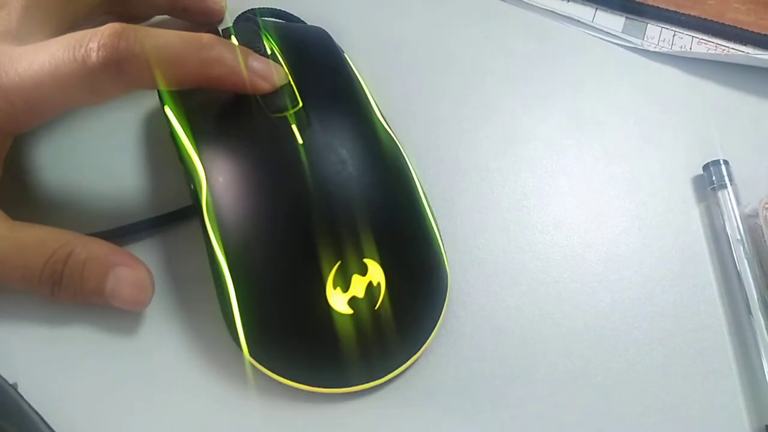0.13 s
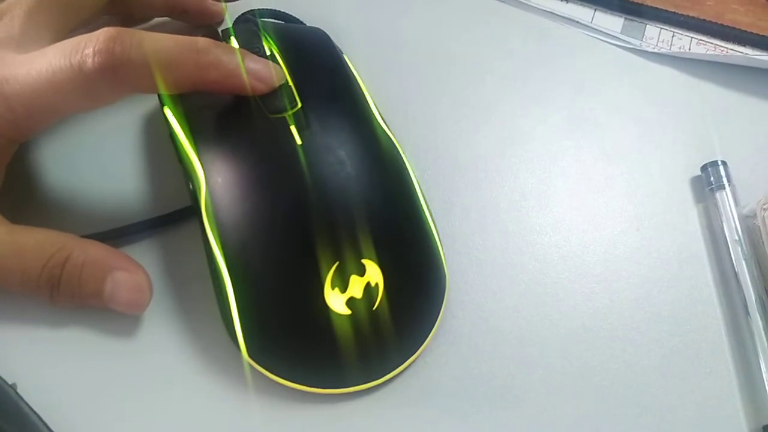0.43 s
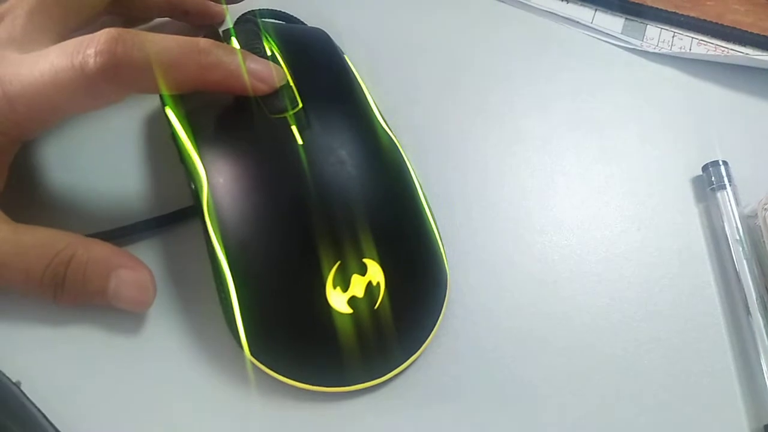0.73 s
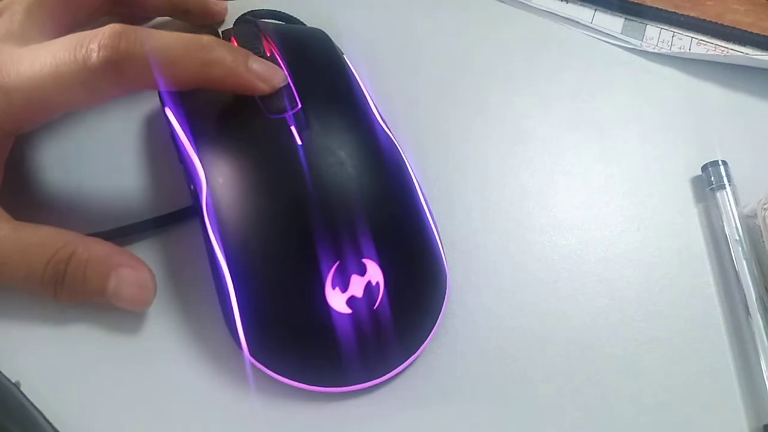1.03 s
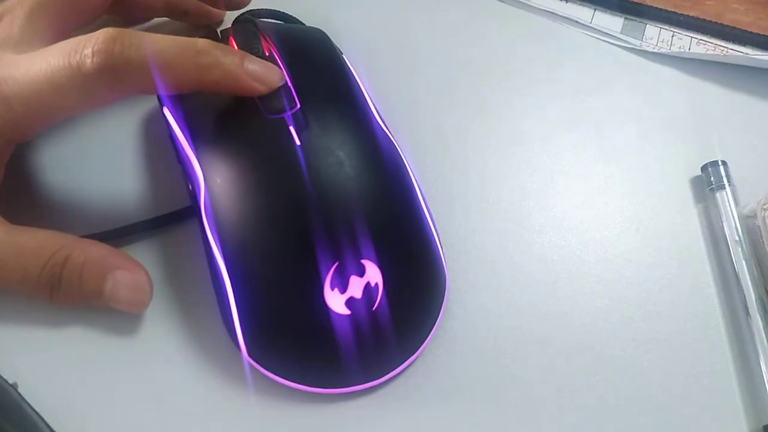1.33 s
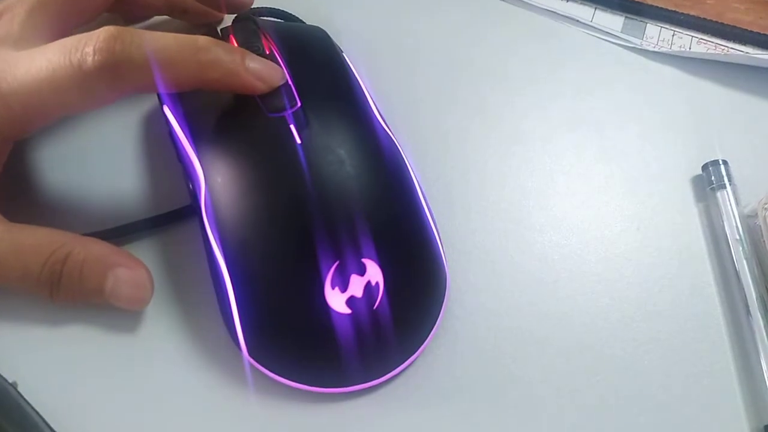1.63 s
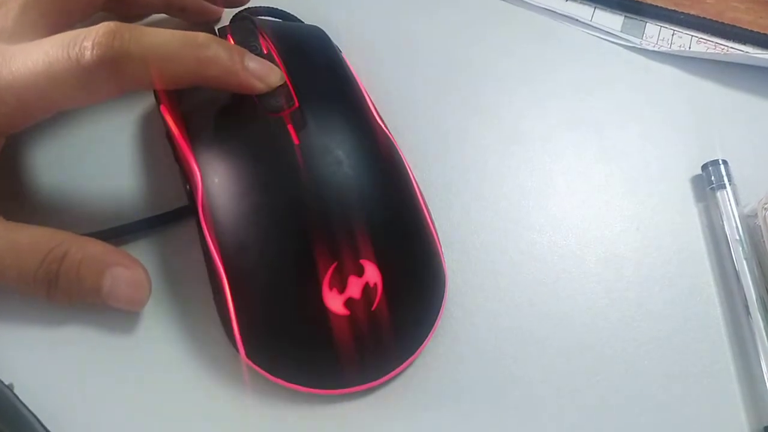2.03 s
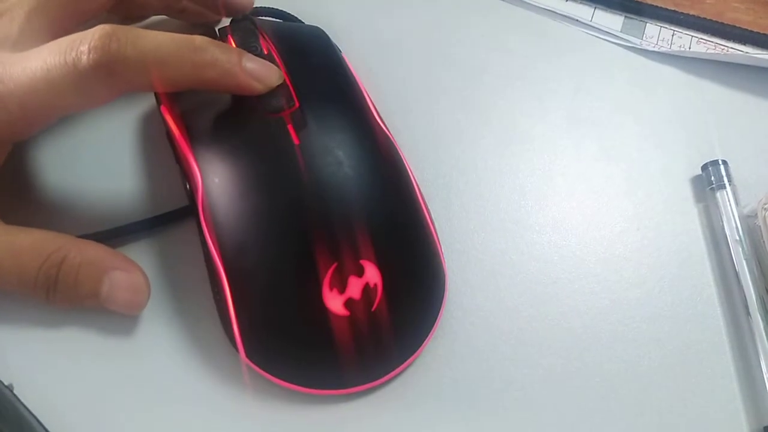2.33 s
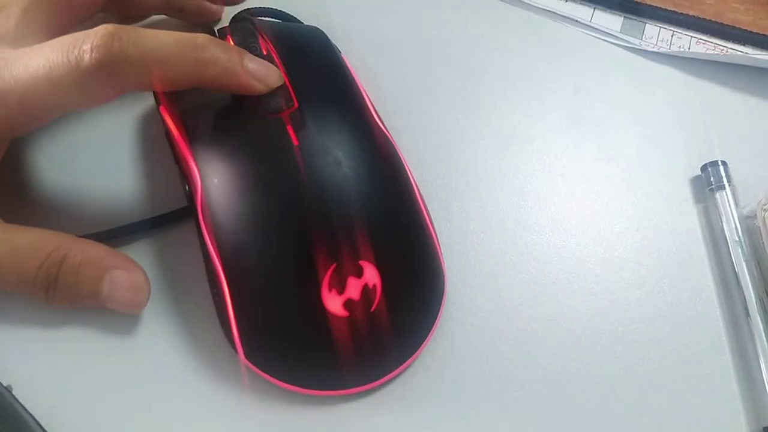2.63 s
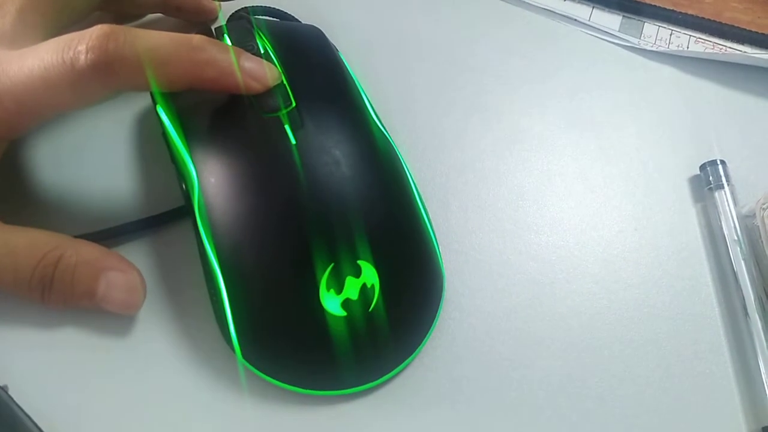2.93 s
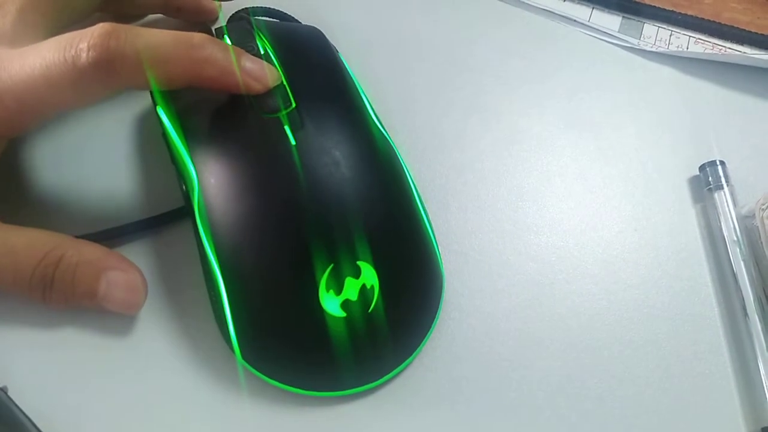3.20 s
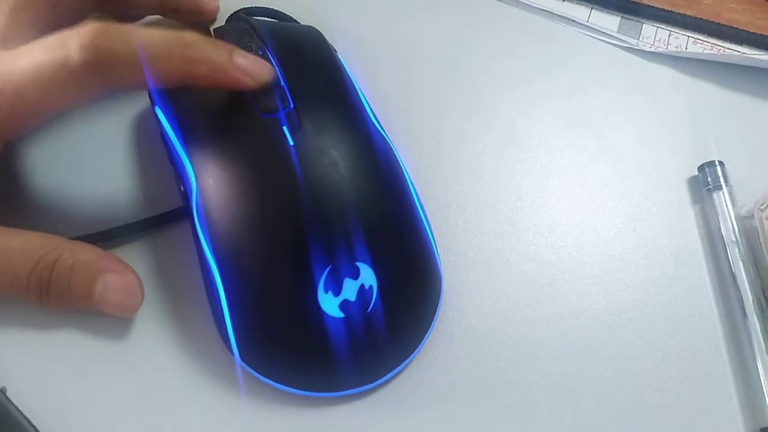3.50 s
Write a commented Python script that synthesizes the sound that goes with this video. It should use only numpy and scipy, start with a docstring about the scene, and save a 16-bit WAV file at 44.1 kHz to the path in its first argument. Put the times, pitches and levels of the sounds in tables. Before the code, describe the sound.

A computer mouse button clicks sharply down and up several times, with a faint fan drone behind.

```python
"""Mouse clicks on a desk

A finger presses and releases a computer mouse button close to the right microphone. Each snap of the
switch rings the plastic shell for a few milliseconds, and the small room answers. A computer fan and
mains hum drone behind, with a faint uneven hiss and, in the first second, a thin whistle."""
import sys
import numpy as np
from scipy import signal
from scipy.fft import rfft, irfft
from scipy.io import wavfile
from scipy.ndimage import uniform_filter1d

SR = 44100
rng = np.random.default_rng(int(sys.argv[2]) if len(sys.argv) > 2 else 0)


def persist_wave(psi):
    """Save psi, clipped to +-1, as 16-bit WAV."""
    counts = np.round(np.clip(psi, -1, 1) * 32767).astype(np.int16)
    wavfile.write(sys.argv[1], SR, np.atleast_2d(counts).T)


N = 161406
T = np.arange(N) / SR

# tone of the fan and room air (frequency [Hz], left density [dB], right density [dB])
AIR_SPECTRUM = [(20, -83, -94), (37.3, -93, -106), (45.8, -75, -86), (55.3, -59.5, -63.5),
                (78, -66.5, -70.5), (119, -61, -64), (183, -68.5, -73), (272, -66, -70.5),
                (351, -80.5, -73), (430, -68.5, -73), (532, -77.5, -77), (700, -75, -76.5),
                (855, -81.5, -71.5), (1190, -77, -82), (1448, -84, -81), (1936, -91.5, -88),
                (2090, -79, -88), (2256, -100, -102), (2930, -104.6, -95), (3420, -116, -109),
                (4430, -112.4, -102), (5000, -119.3, -101), (6280, -125, -100), (6580, -125, -112),
                (7700, -128.6, -110), (9000, -129, -119), (11300, -128, -122), (14100, -132, -131),
                (15500, -140, -140)]
# how alike the air is on both sides (frequency [Hz], correlation [-1..1])
AIR_CORRELATION = [(40, 1), (125, 1), (260, 0.86), (450, 0.55), (750, -0.49), (1300, 0.099), (2100, -0.057),
                   (5000, 0)]
# level rides on four bands of the air, low to high (time [s], level [dB])
SUB_RIDE = [(0, -2), (1.0, 2), (1.6, -2.5), (2.0, -2), (2.5, 3), (2.8, 4), (3.2, -0.5), (3.65, 3.5)]
RUMBLE_RIDE = [(0, -.5), (1.0, 1), (1.6, 0), (2.0, 0.5), (2.4, 2.5), (2.8, 0.5), (3.2, 0), (3.65, 1.5)]
LOW_HISS_RIDE = [(0, -0.5), (.45, -4), (.85, 2.5), (1.4, -8), (1.65, -0.5), (1.9, -3.5), (2.4, 2.5),
                 (2.62, 2.5), (3.15, -3), (3.65, -2.5)]
HIGH_HISS_RIDE = [(0, 6.5), (.38, -1), (.45, 8), (.62, 1), (.85, -4.5), (1.0, -3), (1.45, -11),
                  (1.56, -2.5), (1.75, -4.5), (1.9, -5), (2.4, -2), (2.62, -2.5), (3.15, 1), (3.65, -7.5)]
# level rides on two narrow bands of treble noise (time [s], level [dB])
SIZZLE_RIDE = [(0, -46), (.1, -59.5), (.24, -62), (.45, -80), (.7, -69), (.85, -76), (.98, -78),
               (1.35, -74), (1.5, -73), (1.75, -73.5), (1.9, -79), (2.45, -80), (2.85, -74), (3.2, -72),
               (3.65, -83)]
SHEEN_RIDE = [(0, -75), (.2, -73), (.38, -73), (.48, -94), (.7, -110)]
# path of the thin whistle (time [s], pitch [Hz], level [dB])
WHISTLE_PATH = [(.04, 12900, -84), (.2, 11800, -79), (.3, 13200, -88), (.4, 13050, -79), (.49, 13400, -70),
                (.55, 13100, -69), (.62, 12400, -88), (.72, 13150, -76), (.8, 12650, -82),
                (.85, 12100, -79), (.9, 11300, -84)]
# hum tones (multiple of the mains or shaft rate, left [dB], right [dB], left phase lead [rad])
MAINS_TONES = [(2, -46, -51, .2), (6, -56, -60, .3), (8, -64, -68, 0)]
FAN_TONES = [(5, -53.5, -57.5, 0), (10, -53.5, -58, .1), (20, -64, -60, -.2), (33, -64, -81, -.9),
             (37, -67, -71, 1.1), (39, -61, -74, -.1), (41, -57.5, -69, -1.3), (49, -54, -53.5, -2.4),
             (50, -54.7, -56, -.6), (52, -72, -60, -1.3), (53, -66, -74, -1.2), (54, -67, -61, .1),
             (55, -69, -58, -2.1), (56, -72, -63, -2.4), (57, -67, -62, -1.5), (59, -64.5, -67.5, -1.3),
             (61, -64, -68, -1.3), (65, -61, -67, -2.4), (66, -63, -66.5, .3), (70.36, -70.5, -75, .9),
             (80, -70, -72, -.8), (110, -75, -79, .6)]
# room tail (frequency [Hz], left [dB], right [dB], right t60 before the taper [s])
ROOM_BANDS = [(1000, -8, -7.5, 0.38), (2450, -5.5, -3, 0.6), (3420, -15, -6, 0.89), (3700, -11, -6, 0.49),
              (6300, -20, -5, 1), (7240, -17.5, -5.5, 0.62), (8640, -24, -8, 0.86),
              (11300, -28, -14.5, 0.61), (12100, -28, -14.5, .45), (13700, -37, -17, 0.43),
              (14800, -53, -37, 0.23)]
# early reflections off nearby things (delay [s], level [dB])
REFLECTIONS = [(0.0093, -23.5), (.0128, -36), (.022, -47)]
# EQ of the switch's crack, the button's knock and the shadowed left side (frequency [Hz], gain [dB])
CRACK_EQ = [(300, -28), (1500, 3), (2500, -2), (3300, -9), (4000, 7), (8000, 13), (11500, 8.5), (14000, -8),
            (15500, -22)]
KNOCK_EQ = [(300, -33), (1200, -7.5), (2000, 0.5), (2600, -2), (3200, -5), (5000, -35), (15000, -60)]
SHADOW_EQ = [(1500, -5.5), (2600, -7), (3800, -17), (5100, -28.5), (6300, -9.5), (7300, -30), (8300, -17),
             (10000, -28), (12500, -21), (14500, -50)]
# shell resonances with the button down and up (frequency [Hz], level [dB], t60 [s])
DOWN_MODES = [(2570, -12, 0.011), (3860, -6, .012), (4505, -5.5, 0.015), (5060, -0.5, 0.0053),
              (5930, -10, 0.0086), (6690, -0.5, 0.0045), (7940, -6.5, 0.015), (8500, -21, 0.013),
              (9340, -16, .009), (9500, -5, 0.0043), (10420, -9, 0.0068), (11150, -13, .01),
              (12970, -10.5, .005), (14400, -30, .006)]
UP_MODES = [(2690, -11, 0.028), (3880, -3.5, 0.0055), (4570, -7, 0.024), (5340, -12, 0.0054),
            (5930, -5, 0.006), (7000, -8, .01), (7320, 0.5, .013), (7760, -5, 0.013), (8540, -9, 0.011),
            (9690, -8, 0.003), (9980, -2.5, 0.0048), (11220, 0, 0.0082), (11900, -11, .009),
            (13900, -17, .007)]
# button going down, springing back, ticking under the lifting finger
# (time [s], level [dB], shell brightness [dB/octave])
PRESSES = [(.9981, 1.5, -0.8), (1.958, 2, -1), (2.6709, 2.5, -2), (3.2424, 2.5, -1.5)]
RELEASES = [(.2425, 3, .4), (1.2503, 2.5, -2), (2.2213, 3, -0.7), (2.9163, 3, -0.2), (3.4326, 3, .3)]
TICKS = [(3.537, -15.5, -3)]
# notches in the microphones' response (frequency [Hz], width [Hz], depth [0..1])
MIC_NOTCHES = [(3380, 190, 1), (2340, 120, 0.29)]


def amp(db):
    """Decibels to gain."""
    return 10 ** (np.asarray(db) / 20)


def unit_rms(x):
    """Scales to rms 1."""
    return x / np.sqrt(np.mean(abs(x) ** 2) + 1e-20)


def lookup(table, hz, column=1):
    """One column of a table along log frequency."""
    columns = np.transpose(table)
    return np.interp(np.log(hz + 1), np.log(columns[0] + 1), columns[column])


def ride(curve, t):
    """Level of a ride in dB at the given times."""
    return np.interp(t, *np.transpose(curve))


def add(mix, start_s, sound):
    """Mixes a stereo sound in at a time."""
    part = mix[:, round(start_s * SR):][:, :sound.shape[1]]
    part += sound[:, :part.shape[1]]


def equalise(x, curve, size=2048):
    """Minimum-phase filter with the given dB curve."""
    hz = abs(np.fft.fftfreq(size, 1 / SR))
    log_gain = np.log(amp(lookup(curve, hz)))
    taps = np.fft.ifft(np.exp(np.conj(signal.hilbert(log_gain)))).real
    return signal.fftconvolve(x, taps)[:len(x)]


def drift(rate_hz):
    """Slow complex wander of rms 1."""
    knots = rng.standard_normal((2, 256))
    real, imag = (np.interp(T * rate_hz, np.arange(256), row) for row in knots)
    return unit_rms(real + 1j * imag)


def blur(width_hz):
    """Low-passed noise of rms 1 that smears a tone by this width to either side."""
    lowpass = signal.butter(2, width_hz, fs=SR, output="sos")
    return unit_rms(signal.sosfilt(lowpass, rng.standard_normal(N)))


def air(size=2048, hop=512):
    """Low rush of moving air, and above it a faint hiss that comes and goes in patches."""
    sub_top_hz, rumble_top_hz, hiss_from_hz, hiss_split_hz = 72, 540, 2350, 3400
    hz = np.fft.rfftfreq(size, 1 / SR)
    t = np.arange(N // hop + 5)[:, None] * hop / SR
    noise = rng.standard_normal((5, len(t), len(hz)))
    left, unrelated = noise[0] + 1j * noise[1], noise[2] + 1j * noise[3]
    alike = lookup(AIR_CORRELATION, hz)
    right = alike * left + np.sqrt(1 - alike ** 2) * unrelated
    patches = unit_rms(uniform_filter1d(uniform_filter1d(noise[4], size=6, axis=0), size=9, axis=1))
    rush_db = np.where(hz < sub_top_hz, ride(SUB_RIDE, t), ride(RUMBLE_RIDE, t) * (hz < rumble_top_hz))
    rush_db += 1.5 * patches
    hiss_db = np.where(hz < hiss_split_hz, ride(LOW_HISS_RIDE, t), ride(HIGH_HISS_RIDE, t))
    hiss_db += 2.4 * np.interp(t, T, drift(rate_hz=14).real)  # the whole hiss flutters
    hiss_db += 5.5 * np.minimum(patches, 1.5)
    frames = np.array([left, right]) * amp(np.where(hz > hiss_from_hz, hiss_db, rush_db))
    bed = signal.istft(frames.transpose(0, 2, 1), nperseg=size, noverlap=size - hop)[1]
    bed *= np.sqrt(1.5 * SR / size)
    bed_hz = np.fft.rfftfreq(bed.shape[1], 1 / SR)
    tone = amp([lookup(AIR_SPECTRUM, bed_hz, side) for side in (1, 2)])
    return amp(-2) * irfft(rfft(bed) * tone)[:, :N]


def hum(mains_hz=49.97, shaft_hz=16.005, waver=0.053, gain_db=1):
    """Mains and fan tones, each wavering a little."""
    out = np.zeros((2, N))
    for base_hz, tones in ((mains_hz, MAINS_TONES), (shaft_hz, FAN_TONES)):
        for multiple, left_db, right_db, lead in tones:
            tone = np.exp(2j * np.pi * (multiple * base_hz * T + rng.random()))
            tone *= 1 + waver * drift(rate_hz=2.54)
            out += [amp(left_db) * (tone * np.exp(1j * lead)).real, amp(right_db) * tone.real]
    return np.sqrt(2) * amp(gain_db) * out


def narrow_hiss(curve, hz, width_hz):
    """A narrow band of noise following a level ride."""
    band = (blur(width_hz) + 1j * blur(width_hz)) * np.exp(2j * np.pi * hz * T)
    return amp(ride(curve, T)) * band.real / np.sqrt(2)


def whistle_and_sizzle(waver_hz=90, flicker=0.7, left_db=-19):
    """A thin, unsteady whistle, a sizzle and an airy sheen, all well to the right."""
    times, hz, db = np.transpose(WHISTLE_PATH)
    pitch = np.interp(T, times, hz) + waver_hz * drift(rate_hz=30).real
    level = amp(np.interp(T, times, db, left=-np.inf, right=-np.inf))
    level *= 1 + flicker * drift(rate_hz=20).real
    whistle = level * blur(width_hz=110) * np.sin(2 * np.pi * np.cumsum(pitch) / SR)
    sizzle = narrow_hiss(SIZZLE_RIDE, hz=7760, width_hz=230)
    sheen = narrow_hiss(SHEEN_RIDE, hz=13800, width_hz=350)
    return (whistle + sizzle + sheen) * amp([left_db, 0])[:, None]


def room_tail(click, size=16384, hold_s=0.0083, taper_s=0.21, left_t60_share=0.45):
    """The room's diffuse answer to one click: each band dies at its own speed, sooner on the left."""
    send = 0.4 * click[1]
    send[0] += amp(-13.5)  # an impulse for the broad crack that leaves the mouse in all directions
    hz, t, noise = signal.stft(rng.standard_normal((2, size)), SR, nperseg=256)
    decay_db = -60 * np.maximum(t - hold_s, 0) / lookup(ROOM_BANDS, hz, column=3)[:, None]
    fade = amp([decay_db / left_t60_share, decay_db]) / (1 + (t / taper_s) ** 4)
    fade /= np.sqrt((fade ** 2).mean(2, keepdims=True) * size)  # equal energy whatever the decay
    level = amp([lookup(ROOM_BANDS, hz, side) for side in (1, 2)])[:, :, None]
    response = signal.istft(noise * fade * level, SR, nperseg=256)[1]
    return signal.fftconvolve(send[None], response, axes=1)


def snap_envelope(t, hold_s, t60, attack_s=0.000098, sag_db_per_s=1200):
    """Fast rise, a short, nearly level hold that sags slightly, then free decay."""
    fall_db = sag_db_per_s * np.minimum(t, hold_s) + 60 * np.maximum(t - hold_s, 0) / t60
    return (1 - np.exp(-t / attack_s)) * amp(-fall_db)


def shell_ring(t, modes, brightness, pivot_hz=6000, detune=0.0013):
    """The plastic shell rings in its modes, tuned a hair differently on every snap."""
    out = np.zeros(len(t))
    for hz, db, t60 in modes:
        level = amp(db + brightness * np.log2(hz / pivot_hz))
        pitch = hz * (1 + detune * rng.standard_normal())
        tone = np.sin(2 * np.pi * (pitch * t + rng.random()))
        out += level * snap_envelope(t, hold_s=0.0031, t60=t60) * tone
    return out


def switch_snap(modes, brightness, size=2400):
    """Shell ring and a bright crack, shadowed on the left, over the button's dull knock on the body."""
    t = np.arange(size) / SR
    shell = shell_ring(t, modes, brightness)
    crack = unit_rms(equalise(rng.standard_normal(size), CRACK_EQ))
    crack *= snap_envelope(t, hold_s=0.0033, t60=0.029)
    knock = np.array([unit_rms(equalise(noise, KNOCK_EQ)) for noise in rng.standard_normal((2, size))])
    knock *= snap_envelope(t, hold_s=0.0044, t60=0.044)
    right = amp(-36.5) * shell + amp(-43.5) * crack
    return np.array([equalise(right, SHADOW_EQ), right]) + amp(-51.5) * knock


def mouse_button():
    """Presses, releases and a light tick, with their reflections and room tails."""
    out = np.zeros((2, N))
    for events, modes in ((PRESSES, DOWN_MODES), (RELEASES, UP_MODES), (TICKS, DOWN_MODES)):
        for start_s, db, brightness in events:
            click = switch_snap(modes, brightness)
            add(out, start_s, amp(db) * click)
            add(out, start_s, amp(db) * room_tail(click))
            for delay_s, reflection_db in REFLECTIONS:
                add(out, start_s + delay_s, amp(db + reflection_db) * click)
    # the opening press is wetter: its tail starts 7 dB up and fades an extra 30 dB a second
    click = switch_snap(DOWN_MODES, brightness=0)
    tail = room_tail(click)
    add(out, 0, amp(1) * click)
    add(out, 0, tail * amp(7 - 30 * T[:tail.shape[1]]))
    return out


def scene():
    """Mouse clicks over the drone of the room."""
    return mouse_button() + hum() + air() + whistle_and_sizzle()


def record(dry, shelf_hz=14400, shelf_db=-10, cutoff_hz=15400):
    """The microphones' colour: a shelf down in the top treble, narrow notches and a steep high cut."""
    hz = np.fft.rfftfreq(2 * N, 1 / SR)
    gain = amp(shelf_db * np.clip((hz - shelf_hz) / 200, 0, 1))
    for notch_hz, width_hz, depth in MIC_NOTCHES:
        gain = gain * (1 - depth / (1 + 2j * (hz - notch_hz) / width_hz))
    gain *= amp(-np.clip((hz - cutoff_hz) / 12, 0, 100))
    mirrored = np.hstack([dry, dry[:, ::-1]])  # keeps the ends free of clicks
    return irfft(rfft(mirrored) * gain)[:, :N]


dry = scene()
out = record(dry)
persist_wave(out)
```